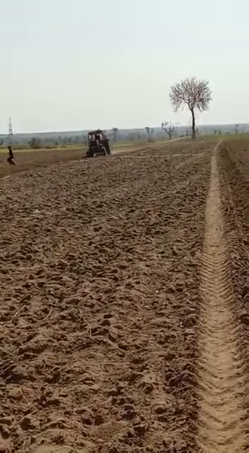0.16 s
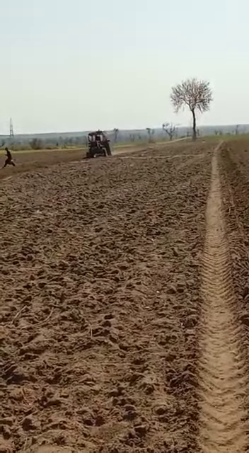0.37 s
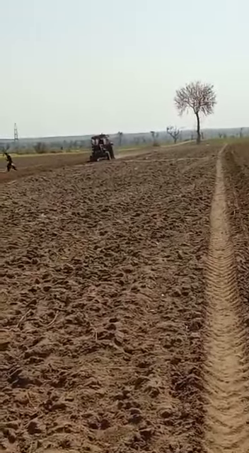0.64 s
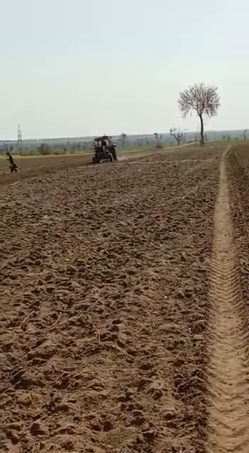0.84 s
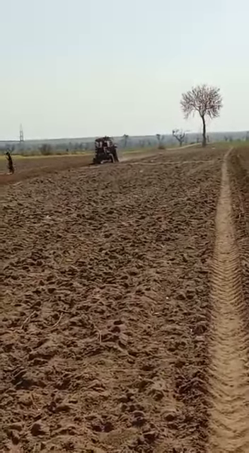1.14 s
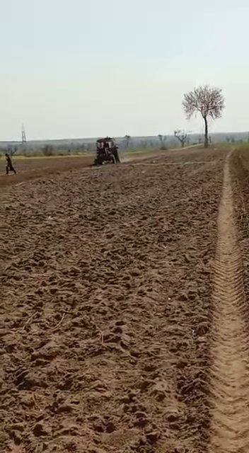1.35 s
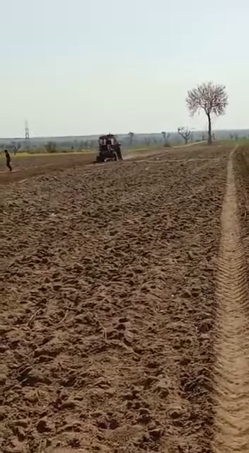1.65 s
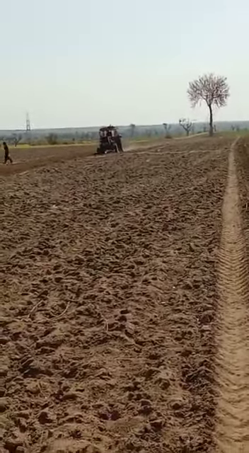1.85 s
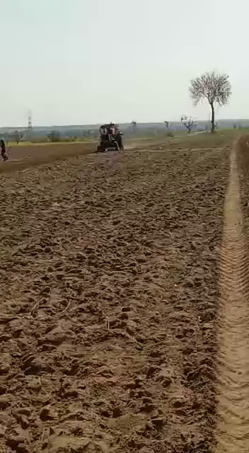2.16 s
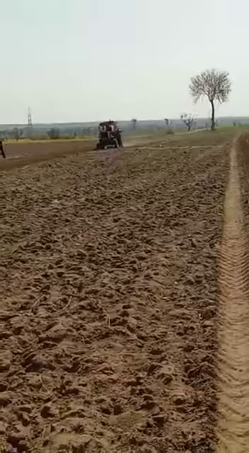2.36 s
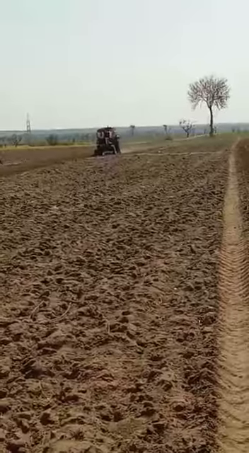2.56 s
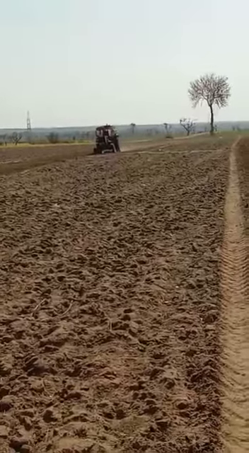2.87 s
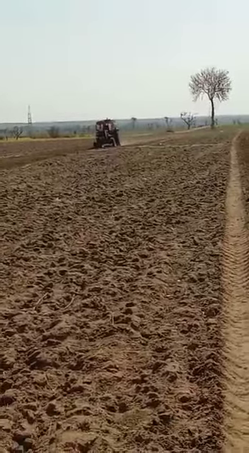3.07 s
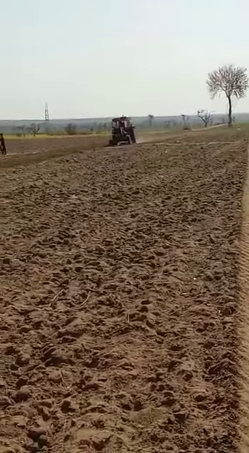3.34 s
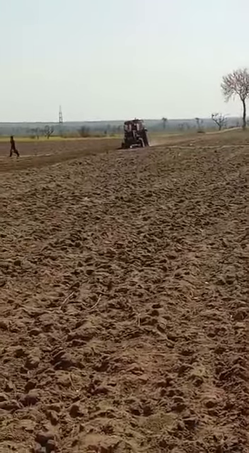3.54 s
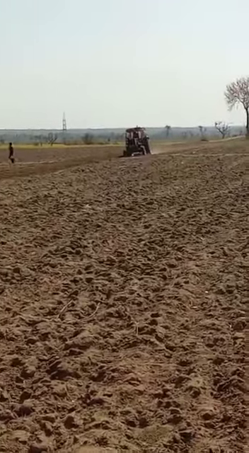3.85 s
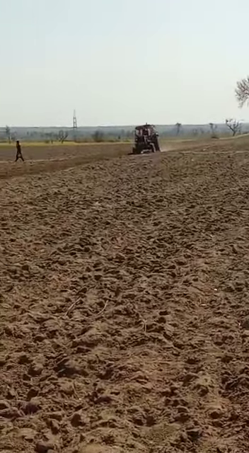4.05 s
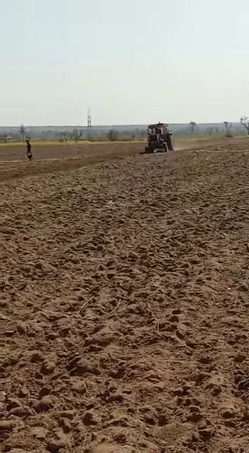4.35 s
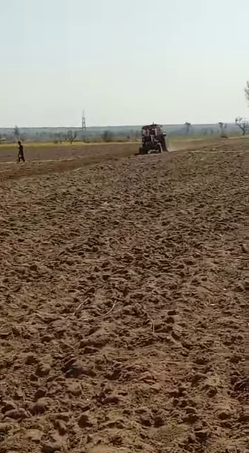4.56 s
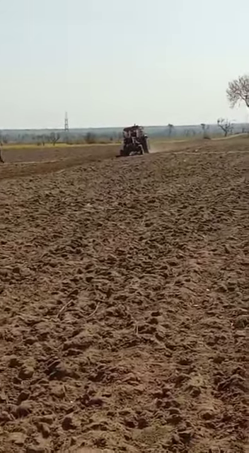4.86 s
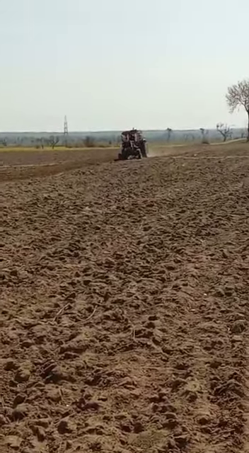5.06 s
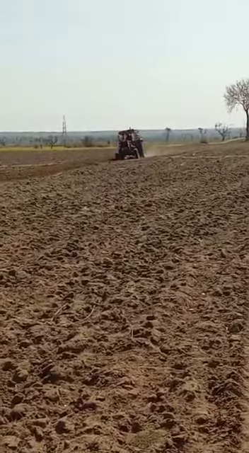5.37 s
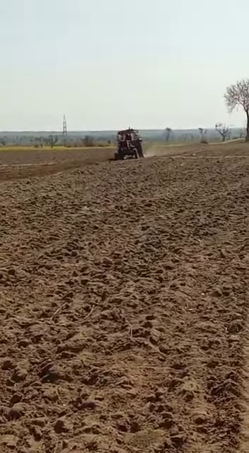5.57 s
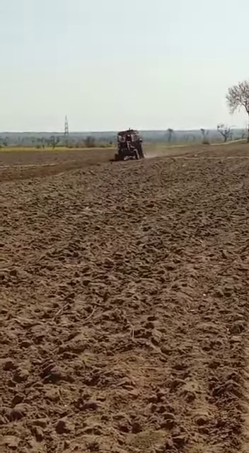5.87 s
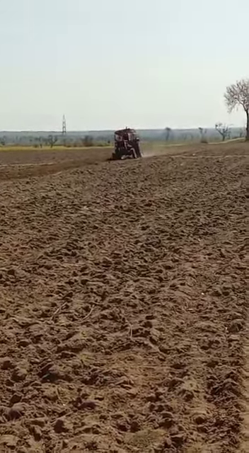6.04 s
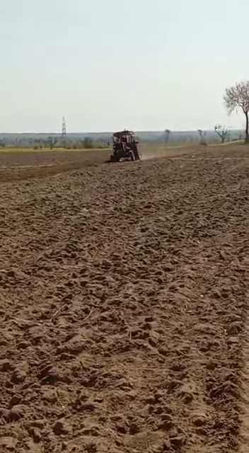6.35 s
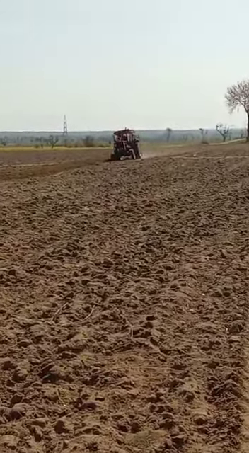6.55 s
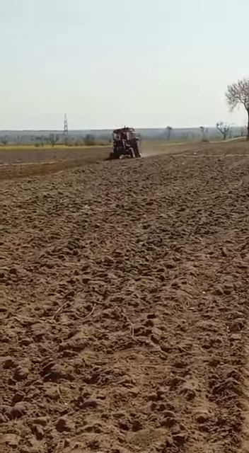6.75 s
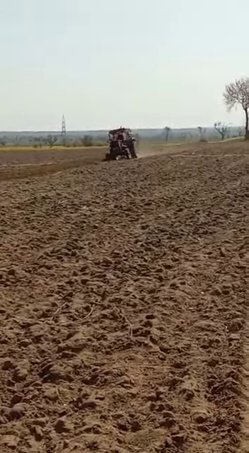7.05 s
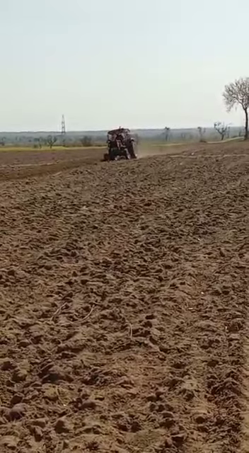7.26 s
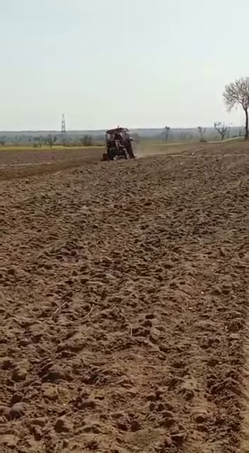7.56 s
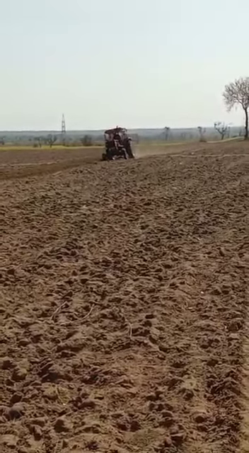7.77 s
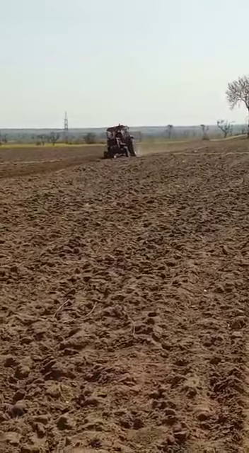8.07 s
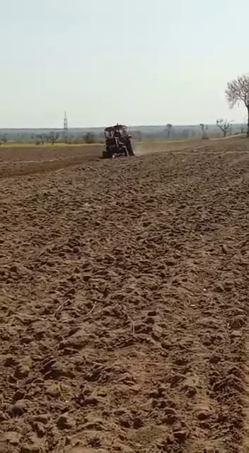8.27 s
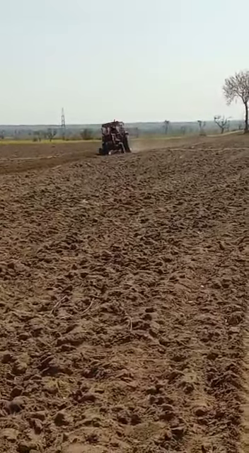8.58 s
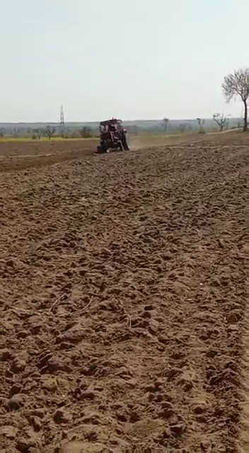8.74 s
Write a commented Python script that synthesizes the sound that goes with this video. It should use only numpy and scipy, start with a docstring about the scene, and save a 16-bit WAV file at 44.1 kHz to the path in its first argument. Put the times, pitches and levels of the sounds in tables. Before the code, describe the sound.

A hand-held microphone far from a working tractor catches steady diesel clatter, around forty knocks a second, some harder than others. At first it is thin and wavering, with small low thumps near the start. The engine speed barely shifts, sagging slightly after the middle. As the machine nears, the knock, hum and roar fill out, with bright fizzing treble in the last two seconds over faint low wind.

```python
"""Hard diesel clatter over a low exhaust beat: a three-cylinder tractor works across a field, slowly nearing.
Each firing knocks the block: a smeared blow and noise bursts ring through resonances in five registers.
The exhaust is a set of wavering cosines locked to the firings; a hum and a throbbing noise roar join it.
Moving air makes the clatter swell and fade; low wind noise, short thumps, a tick and hiss lie behind."""
import sys
import numpy as np
from scipy import signal
from scipy.fft import rfft, irfft, next_fast_len
from scipy.io import wavfile
from scipy.ndimage import uniform_filter1d, map_coordinates

SR = 44100
rng = np.random.default_rng(int(sys.argv[2]) if len(sys.argv) > 2 else 0)


def persist_wave(psi):
    """Save psi, clipped to +-1, as 16-bit WAV."""
    counts = np.round(np.clip(psi, -1, 1) * 32767).astype(np.int16)
    wavfile.write(sys.argv[1], SR, np.atleast_2d(counts).T)


N = 392931
TIME_S = np.arange(N) / SR

# Level tables hold values before the trims, gains and wavering added in the code.
# Engine speed, sagging a little under load. Each row: time in seconds, firings per second.
FIRING_RATE = [(0.0, 40.625), (2.42, 40.636), (2.67, 41.102), (3.01, 40.933), (4.08, 41.493),
               (4.89, 41.164), (5.35, 40.405), (6.02, 39.752), (6.24, 40.118), (7.42, 40.139),
               (7.84, 39.453), (8.91, 39.726)]
FIRST_FIRING_COUNT = .159  # firing periods before the first firing
# Voice of each cylinder, in firing order. Each row: low knock, high knock, treble, all in dB.
CYLINDER_VOICES = [(6, 2, 6.5), (1.7, 3, 2.5), (-0.9, 3, -0.3)]
# Firings that replace the cylinder's voice. Each row: time in seconds, low knock, high knock, treble in dB.
HARD_KNOCKS = [(0.176, -9, 9, 9), (0.299, 3, -4, 9), (0.324, -1, 5.5, 8), (0.398, 8, 6.5, 5.5),
               (0.545, 8, 10.5, 10), (0.57, -8, 14, 3), (0.595, 9.5, 10, 11.5), (1.308, 9, 9.5, -4),
               (1.579, 6, 14, 4), (1.628, 11.5, -1, 12.5), (1.727, -10, 12.5, 9), (1.899, 2, 4.5, 12.5),
               (2.17, 5, 3, 5), (2.317, 9, 5.5, 3), (2.514, 6, 10, 14), (2.587, 11.5, 13.5, 16),
               (2.709, 1, 9, 6), (2.758, 6, 9, -7), (2.807, 9.5, 6.5, -3), (2.831, 10, -3, -2),
               (2.977, 9.5, 7.5, 3), (3.026, 11, 10.5, 24), (3.246, 9, -3, 7), (3.707, 6, 11.5, 4),
               (3.828, -11, 13, 10.5), (3.877, -2, 10, -6), (3.997, 9.5, 6, 3), (4.142, -2, 9.5, 1),
               (4.166, -4, 8, 6.5), (4.504, 10.5, -2, 8.5), (4.965, 13, 1, 6), (5.408, 6.5, -6, 15.5),
               (5.433, 9.5, 1, 14), (5.557, -1, 4, 8.5), (5.681, 7.5, 7.5, 2), (5.806, 14.5, 5.5, 6.5),
               (5.831, 8, 9, 1), (5.956, -8, 9.5, 8), (6.007, -2, 9, 9.5), (6.032, 6, -2, 12.5),
               (6.107, 10.5, -3, 5), (6.157, 7, 7.5, 7.5), (6.207, 4, 13.5, 4.5), (6.382, 9.5, 8.5, 6.5),
               (6.531, 10.5, 4, 4), (6.631, -7, 7.5, 6), (6.656, 8, 9.5, 10.5), (6.756, -9, 9.5, -8),
               (6.855, 8, 7, 7.5), (6.88, 0, 13, 0), (7.03, 7.5, 8.5, 10), (7.08, 12.5, 3.5, 10),
               (7.155, 10, 6, 11.5), (7.204, 0, 8, 12.5), (7.304, 7, 10, 11), (7.329, -2, 8.5, 6),
               (7.379, 10, 6, 16), (7.453, 8, 10.5, 8), (7.579, 0, 6, 10), (7.654, 9, 6, 6),
               (7.78, 7, 8.5, 10), (8.21, 8.5, 9, 10), (8.286, 15.5, 11, 16), (8.311, 0, 10, 12),
               (8.337, 7, 7, 11), (8.438, -2, 10, 14), (8.463, 5.5, 6, 1), (8.614, 7.5, 12.5, 14),
               (8.665, 10, 3, 15), (8.816, 14, -4, 8), (8.866, 5, 6.5, 2)]
# Clatter resonances from far off. Each row: centre in Hz, width in Hz, relative level in dB.
FAR_MODES = [(763, 280, -39), (908, 270, -25), (1270, 115, -13.5), (1398, 160, -9), (1610, 140, -10),
             (1817, 210, -11), (2115, 70, -12.5), (2540, 270, -8), (2740, 140, -4), (3214, 360, -4.5),
             (3450, 230, -4.5), (4400, 540, -13), (4800, 360, -15), (5273, 215, 4), (6010, 190, -5.5),
             (6350, 350, -14.5), (6900, 250, -9.5), (7690, 230, -15.5), (8180, 260, -26), (8700, 160, -30),
             (10800, 1700, -52), (13100, 6000, -56.5)]
# Clatter resonances from nearer. Each row: centre in Hz, width in Hz, relative level in dB.
NEAR_MODES = [(770, 316, -58), (899, 165, -50), (1228, 59, -10.5), (1336, 93, -1.5), (1568, 200, 1.5),
              (1752, 122, 2), (2120, 190, -10), (2510, 178, -4.5), (2704, 170, -4.5), (3244, 236, 3.5),
              (3380, 165, 1), (3973, 180, -10.5), (4250, 240, -10), (5034, 262, -0.5), (5630, 120, -3.5),
              (5830, 170, -8), (6590, 520, -8), (7400, 230, -19), (7720, 330, -19), (8050, 410, -30.5),
              (8480, 250, -28.5), (10960, 3000, -53), (14700, 3900, -50.5)]
# Narrow dips in the clatter at any distance. Each row: centre in Hz, width in Hz, gain in dB.
DIPS = [(3716, 120, -6), (6070, 120, -9), (7200, 120, -1)]
# Edges between the clatter registers, in Hz.
REGISTER_EDGES_HZ = [1050, 2250, 3750, 6150, 9000, 17000]
# Trim of low knock, high knock, treble, upper treble and fizz, in dB.
REGISTER_TRIM_DB = [1, 1, 1, 1, -0.86]
# Low knock as the air carries it. Each row: time in seconds, level in dB.
LOW_KNOCK_LEVEL = [(0.0, -63), (0.37, -55.5), (0.52, -62.5), (0.57, -55), (1.09, -64.5), (2.17, -47.5),
                   (2.27, -57.5), (2.32, -50.5), (2.47, -48), (2.51, -44), (3.03, -48.5), (3.1, -57),
                   (3.32, -49), (4.19, -54), (5.04, -54), (5.09, -48.5), (5.26, -56), (5.46, -55.5),
                   (5.68, -47.5), (5.73, -55), (5.78, -51), (6.93, -45.5), (7.0, -41.5), (7.45, -39.5),
                   (7.5, -48), (7.68, -47.5), (7.73, -41.5), (7.88, -53.5), (8.08, -44), (8.16, -47),
                   (8.21, -40.5), (8.32, -42), (8.36, -44.5), (8.42, -39), (8.89, -42)]
# High knock. Each row: time in seconds, level in dB.
HIGH_KNOCK_LEVEL = [(0.0, -62), (0.08, -56), (0.4, -51), (0.5, -61.5), (0.74, -48), (0.79, -55),
                    (0.87, -54.0), (1.06, -67.5), (1.19, -59), (1.36, -61.5), (1.92, -44.5), (2.17, -48),
                    (2.22, -53.5), (2.76, -44), (3.2, -55), (3.27, -51.5), (4.21, -52), (4.43, -57.5),
                    (4.6, -46), (4.67, -54.5), (4.82, -45.5), (5.14, -50), (5.19, -45), (5.36, -51),
                    (6.03, -44), (6.13, -49), (6.18, -45.5), (6.23, -48), (6.66, -42.5), (6.93, -46),
                    (7.13, -37), (7.33, -40), (7.4, -45), (8.32, -42.5), (8.36, -46), (8.42, -43),
                    (8.61, -41.5), (8.82, -44.5), (8.89, -41.5)]
# Clatter treble. Each row: time in seconds, level in dB.
TREBLE_LEVEL = [(0.0, -56.5), (0.35, -49.5), (0.42, -50.5), (0.47, -68), (0.59, -51), (0.84, -51),
                (1.06, -67.5), (1.28, -64), (1.33, -55.5), (1.46, -68), (1.55, -54), (1.95, -51),
                (2.27, -67), (2.34, -58), (2.61, -60), (2.66, -54.5), (2.93, -55), (3.0, -70),
                (3.08, -61.5), (3.25, -67.5), (3.59, -55.5), (3.66, -60.5), (3.76, -50.5), (3.85, -58),
                (4.24, -54.5), (4.29, -62.5), (4.46, -61), (4.5, -55), (5.09, -47.5), (5.23, -67),
                (5.31, -59), (5.48, -48.0), (5.73, -54.5), (5.83, -46.5), (6.48, -44), (6.88, -52.5),
                (7.35, -49), (7.6, -48), (7.73, -58.5), (8.34, -50), (8.77, -55), (8.89, -48.5)]
# Upper treble of the clatter. Each row: time in seconds, level in dB.
UPPER_TREBLE_LEVEL = [(0.0, -68), (0.08, -58.5), (0.13, -62), (0.84, -62), (0.94, -81), (1.23, -73),
                      (1.36, -96), (1.43, -67), (1.9, -64), (2.44, -68.5), (2.49, -60.5), (2.78, -60),
                      (3.08, -65.5), (3.2, -73), (3.37, -70), (3.49, -78), (3.61, -60.5), (3.95, -72),
                      (4.05, -68), (4.17, -73), (4.58, -67), (4.65, -91), (4.72, -61.5), (5.06, -64),
                      (5.19, -81), (5.41, -60), (5.73, -74), (5.96, -60.5), (6.01, -64), (6.13, -52),
                      (6.21, -73), (6.28, -63), (6.71, -59.5), (6.86, -62), (7.25, -48.5), (7.33, -53),
                      (8.19, -56), (8.89, -54.5)]
# Fizz above the upper treble. Each row: time in seconds, level in dB.
FIZZ_LEVEL = [(0.0, -90), (0.67, -100), (1.65, -81.5), (1.95, -70), (2.19, -72.5), (2.37, -68.5),
              (2.42, -74), (2.64, -65), (2.88, -64), (3.2, -81.5), (3.63, -78), (4.14, -80), (4.24, -78.5),
              (5.33, -82), (6.11, -82.5), (6.18, -85), (6.88, -70.5), (6.93, -63.5), (7.0, -60.5),
              (7.13, -68), (7.35, -58.5), (7.47, -56), (7.58, -70), (7.7, -71), (7.83, -59), (7.91, -61),
              (8.03, -67), (8.11, -59), (8.21, -68), (8.36, -67.5), (8.54, -70), (8.64, -60.5),
              (8.89, -68.5)]
# Exhaust lines. Each row: frequency in thirds of the firing rate, relative level in dB.
EXHAUST_LINES = [(5, -18), (6, 0.5), (9, 1), (11, -29), (12, -25), (15, -27.5), (18, -24.5), (21, -32),
                 (23, -30), (24, -30.5), (26, -34.5)]
# Strongest exhaust line. Each row: time in seconds, level in dB.
BEAT_LEVEL = [(0.0, -63.5), (0.18, -60), (0.64, -74), (0.69, -60.5), (1.14, -67), (2.54, -67),
              (3.97, -62.5), (5.11, -52), (5.21, -62.5), (5.66, -57), (5.81, -63.5), (6.61, -59),
              (6.66, -55), (7.05, -49.5), (7.15, -55.5), (7.25, -48.5), (7.68, -51.5), (7.78, -60),
              (7.93, -53), (8.16, -58.5), (8.46, -51.5), (8.89, -53)]
# Exhaust line above it. Each row: time in seconds, level in dB.
OVERTONE_LEVEL = [(0.0, -62), (0.05, -65.5), (1.48, -68.5), (2.73, -64.5), (4.21, -65.5), (5.11, -59),
                  (5.21, -63), (6.36, -62.5), (7.35, -56), (8.13, -61.5), (8.64, -56), (8.89, -56)]
# Roar spectrum. Each row: frequency in Hz, relative gain in dB.
ROAR_SPECTRUM = [(100, -1), (150, 5), (220, 3.5), (310, -1), (390, -3), (480, -9), (580, -7.5), (720, 2.5),
                 (900, 6), (1060, 0.5), (1300, 4), (2000, -54)]
# Growl under the knock. Each row: time in seconds, level in dB.
GROWL_LEVEL = [(0.0, -77), (1.36, -75.5), (1.43, -68), (1.46, -77), (2.4, -71.5), (2.53, -66), (2.63, -71),
               (3.07, -68.5), (3.1, -73.5), (3.54, -71.5), (3.57, -67), (3.77, -71.5), (4.73, -72),
               (7.46, -66.5), (7.68, -68.5), (8.9, -64.5)]
# Wind spectrum. Each row: frequency in Hz, relative gain in dB.
WIND_SPECTRUM = [(10, -11), (25, -17), (45, -12.5), (65, -5), (90, -1), (115, -16), (150, -12),
                 (220, -22.5), (500, -69)]
# Wind rumble. Each row: time in seconds, level in dB.
WIND_LEVEL = [(0.7, -77), (1.63, -85), (3.87, -80), (5.11, -72), (5.29, -80), (6.23, -81), (7.53, -64),
              (7.85, -83), (7.92, -74), (8.08, -81), (8.83, -75), (8.9, -69)]
# Bumps of wind on the microphone. Each row: start in seconds, peak of the envelope in dB.
THUMPS = [(.2, -51), (0.303, -42), (0.323, -47), (0.35, -47), (0.368, -46), (0.475, -50), (0.542, -48.5)]
# Thin tick close by. Each row: start in seconds, level in dB.
TICKS = [(.143, -51.5)]
# Spectrum of the air over the field. Each row: frequency in Hz, relative gain in dB.
FIELD_SPECTRUM = [(500, -10), (1500, -6), (4400, 5), (6200, -0.5), (8000, -6), (10000, -33)]
# The tractor drives straight towards the microphone.
START_M, SPEED_M_PER_S = 72, 2.2
ROAR_START_DB, ROAR_DB_PER_HALVING = -67, 12  # low roar, before wavering
BAND_EDGE_HZ = 15550


def clatter(firings, jitter_s=.00005, lead_s=0.001185, rush_from_db=-66,
            detour_mean_s=0.000694, detour_sweep=0.19, ground_db=-9):
    """Diesel knock rings the block; the air carries each register differently."""
    at = np.nonzero(np.diff(np.floor(firings)))[0]
    low, high, treble, top = blow_sizes(at)
    offset_s = jitter_s * rng.standard_normal(len(at)) - lead_s
    at = np.clip(at + (SR * offset_s).astype(int), 0, N - 1)
    level_tables = (LOW_KNOCK_LEVEL, HIGH_KNOCK_LEVEL, TREBLE_LEVEL, UPPER_TREBLE_LEVEL, FIZZ_LEVEL)
    levels_db = [curve(rows) for rows in level_tables]
    # as the fizz swells, a rush fills the gaps between the knocks
    rush_db = .5 * (levels_db[-1] - rush_from_db)
    registers = [
        knocks(at, low, half_s=.0024, fresh=.45, tail_db=-6, tail_s=.010,
               bed_db=.4 * rush_db - 10, after_db=-8),
        knocks(at, high, half_s=.0019, fresh=.5, tail_db=-13, tail_s=.012,
               bed_db=.7 * rush_db - 9, after_db=-14),
        knocks(at, treble, half_s=.0020, fresh=.65, tail_db=-10.5, tail_s=.009,
               bed_db=rush_db - 4, after_db=-14),
        knocks(at, top, half_s=.0023, fresh=.85, tail_db=-7, tail_s=.009,
               bed_db=rush_db - 1, after_db=-13),
        knocks(at, top, half_s=.0020, fresh=.9, tail_db=-5, tail_s=.007,
               bed_db=-9.5, after_db=-14)]
    near = np.clip((TIME_S - 2.7) / 0.72, 0, 1)  # crossfade of the two sets of resonances
    # the reflection off the uneven ground wanders and sweeps the colour
    detour_s = detour_mean_s * (1 + detour_sweep * drift(4))
    out = np.zeros(N)
    bands = zip(registers, REGISTER_EDGES_HZ, REGISTER_EDGES_HZ[1:], levels_db, REGISTER_TRIM_DB)
    for (drive, envelope), lo_hz, hi_hz, level_db, trim_db in bands:
        far_block = evened(ringing(drive, FAR_MODES, lo_hz, hi_hz))
        near_block = evened(ringing(drive, NEAR_MODES, lo_hz, hi_hz))
        block = (1 - near) * far_block + near * near_block
        if hi_hz == REGISTER_EDGES_HZ[-1]:
            block = echoed(block, delay_s=.00118, db=-7)
            block = fluttering(block, depth_db=3.5, patch_hz=1100, patch_s=.05)
        else:
            block = echoed(block, delay_s=detour_s, db=ground_db)
            block = wobbling(block, shift_hz=24, per_s=30)
            patch_hz = 140 * np.sqrt(lo_hz / REGISTER_EDGES_HZ[0])
            block = fluttering(block, depth_db=4.8, patch_hz=patch_hz, patch_s=.036)
        delayed_envelope = np.roll(envelope, SR // 1000)
        out += amp(level_db + trim_db) * as_loud_as(block, delayed_envelope, .013)
    return out


def blow_sizes(at, shared_db=.5, own_db=2.5, top_share=0.43):
    """Uneven combustion: each cylinder has its voice, some firings knock hard; top gets a share of treble dB."""
    chance = np.clip(rng.standard_normal((len(at), 5)), -2, 1.6)
    voice_db = np.array(CYLINDER_VOICES, float)[np.arange(len(at)) % len(CYLINDER_VOICES)]
    band_db = np.c_[voice_db, voice_db[:, -1]]
    band_db = band_db + shared_db * chance[:, :1] + own_db * chance[:, 1:]
    for s, low_db, high_db, treble_db in HARD_KNOCKS:
        nearest = np.argmin(abs(at / SR - s))
        band_db[nearest] = low_db, high_db, treble_db, top_share * treble_db
    return amp(band_db.T)


def knocks(at, size, half_s, fresh, tail_db, tail_s, bed_db, after_db,
           after_s=0.014, grain_db=0.2, knock_s=0.0018):
    """Firings as blows smeared by paths through the block, rattle, tail, after-rattle; returns sound, envelope."""
    blows = np.zeros(N)
    blows[at] = size
    t = np.arange(-2048, 2049) / SR
    burst = np.exp(-(t / half_s) ** 4)
    burst *= knock_s * SR / burst.sum()  # rms 1 over the length of a knock
    tail = amp(tail_db) ** 2 * np.exp(-abs(t) / tail_s) * (t > 0)
    tail += amp(after_db) ** 2 * np.exp(-((t - after_s) / half_s) ** 2)
    fresh = np.clip(fresh, 0, 1)  # share of burst power that is noise
    # the tail grows less with the blow than the burst does
    rattle_power = signal.oaconvolve(blows ** 2, fresh * burst, "same")
    rattle_power = rattle_power + signal.oaconvolve(blows, tail, "same")
    smeared_power = signal.oaconvolve(blows ** 2, (1 - fresh) * burst, "same")
    grid_hz = np.linspace(0, SR / 2, 90)
    delay_s = half_s * (-1) ** np.arange(len(grid_hz)) * rng.uniform(.6, 1, len(grid_hz))

    def smear(hz):
        # phase is the integral of delay over frequency
        return np.exp(-2j * np.pi * np.cumsum(np.interp(hz, grid_hz, delay_s)) * hz[1])

    smeared = shaped(blows, smear) * np.sqrt((1 - fresh) * burst.sum())
    grains = evened(amp(grain_db * np.clip(drift(210), -2, 2)))  # loose parts rattle in clumps of a few ms
    bed_power = amp(bed_db) ** 2
    rattle = np.sqrt(abs(rattle_power) + bed_power) * grains * rng.standard_normal(N)
    envelope = np.sqrt(abs(rattle_power + smeared_power) + bed_power) * grains
    return np.array([smeared + rattle, envelope]) / np.sqrt(1 + bed_power)


def ringing(x, modes, lo_hz, hi_hz):
    """Minimum-phase resonances within one band; they ring on after each blow."""
    grid_hz = np.fft.fftfreq(4096, 1 / SR)
    power = sum(amp(db) ** 2 / (1 + (2 * (abs(grid_hz) - f) / width) ** 2) ** 2 for f, width, db in modes)
    dips_db = sum(db * np.exp(-((abs(grid_hz) - f) / width) ** 2) for f, width, db in DIPS)
    log_gain = .5 * np.log(power) + np.log(amp(dips_db))
    gain = np.exp(np.conj(signal.hilbert(log_gain)))[grid_hz > 0]
    grid_hz = grid_hz[grid_hz > 0]
    band_power = 1 / (1 + (lo_hz / grid_hz) ** 40) / (1 + (grid_hz / hi_hz) ** 40)
    return shaped(x, lambda hz: np.interp(hz, grid_hz, gain * np.sqrt(band_power)))


def exhaust(firings, beat_db, overtone_db, waver=0.055, upper_follow=0.19, upper_db=-53):
    """Clean low lines of the firing beat; the weak upper ones swell less."""
    out = np.zeros(N)
    for thirds, line_db in EXHAUST_LINES:
        order = round(thirds) / len(CYLINDER_VOICES)
        if order <= 2:
            level_db = beat_db
        elif order <= 3:
            level_db = overtone_db
        else:
            level_db = upper_db + upper_follow * (beat_db - upper_db)
        unrest = waver * (order / 2) ** 0.89  # higher lines waver more
        angle = 2 * np.pi * (order * firings + rng.random()) + unrest * drift(13)
        out += np.sqrt(2) * amp(level_db + line_db) * np.cos(angle) * (1 + unrest * drift(13))
    return out


def roar(firings, low_db, throb=0.12, growl_db=3.0, growl_waver_db=1.23, repeat=1.12):
    """Dull rush of gas and machinery throbbing with the firings; its upper half, a growl, swells by itself."""
    # part of the rush repeats every engine cycle, which draws faint lines
    cycle = rng.standard_normal(3200)
    cycle_index = (firings / len(CYLINDER_VOICES) * len(cycle)).astype(int) % len(cycle)
    noise = rng.standard_normal(N) + repeat * cycle[cycle_index]
    rush = coloured(noise * (1 + throb * np.cos(2 * np.pi * firings)), ROAR_SPECTRUM)
    lower = shaped(rush, lambda hz: 1 / (1 + (hz / 550) ** 8))
    growl = evened(fluttering(rush - lower, depth_db=3.3, patch_hz=90, patch_s=.09))
    growl = growl * amp(curve(GROWL_LEVEL) + growl_db + growl_waver_db * drift(8.8))
    return amp(low_db) * fluttering(lower, depth_db=2.8, patch_hz=125, patch_s=.06) + growl


def halvings():
    """How many times the distance to the tractor has halved since the start."""
    return np.log2(START_M / np.maximum(START_M - SPEED_M_PER_S * TIME_S, 1))


def driveline(firings, beat_db, ratio=2.37, rel_db=-10.0, third_db=-81, waver_rad=0.77):
    """A wavering hum with a faint third harmonic, as from a shaft geared to the engine."""
    angle = 2 * np.pi * ratio * firings + waver_rad * drift(5.7)
    hum = amp(beat_db + rel_db) * np.cos(angle) + amp(third_db) * np.cos(3 * angle)
    return np.sqrt(2) * hum * (1 + drift(3.1) / 4)


def wind(level_db, gain_db=5):
    """Lumpy low rumble at the microphone: coloured noise under a random swell."""
    lumps = amp(3.2 * drift(16))
    return amp(level_db + gain_db) * evened(coloured(rng.standard_normal(N), WIND_SPECTRUM) * lumps)


def bumps(thump_hz=88, rise_s=0.0055, drop=0.48, tick_hz=12500, tick_s=0.0022):
    """Short low thumps on the microphone, falling in pitch to thump_hz, and a thin tick of decaying noise."""
    out, t = np.zeros(N), np.arange(SR // 10) / SR
    cycles = np.cumsum(thump_hz * (1 + drop * np.exp(-t / rise_s))) / SR
    envelope = t / rise_s * np.exp(1 - t / rise_s)
    for s, db in THUMPS:
        add(out, s, amp(db) * envelope * np.sin(2 * np.pi * cycles))
    band_hz = [0.9 * tick_hz, min(1.14 * tick_hz, SR / 2 - 1)]
    bright = signal.butter(2, band_hz, "band", fs=SR, output="sos")
    for s, db in TICKS:
        noise = evened(signal.sosfilt(bright, rng.standard_normal(len(t))))
        add(out, s, amp(db) * np.exp(-t / tick_s) * noise)
    return out


def hiss(mic_db=-90, field_db=-76):
    """A soft wash of air over the field and the faint even hiss of the microphone."""
    wash = coloured(rng.standard_normal(N), FIELD_SPECTRUM)
    return amp(field_db) * wash + amp(mic_db) * rng.standard_normal(N)


def fluttering(x, depth_db, patch_hz, patch_s):
    """Eddies along the way lift and dim narrow patches of the spectrum."""
    hz, t, z = signal.stft(x, SR, nperseg=512, noverlap=384)
    where = np.meshgrid(hz / patch_hz, t / patch_s, indexing="ij")
    patches = evened(map_coordinates(rng.standard_normal((160, 400)), where, order=2, mode="wrap"))
    z = z * amp(depth_db * np.clip(patches, -2, 2))
    return signal.istft(z, SR, nperseg=512, noverlap=384)[1][:N]


def echoed(x, delay_s, db):
    """One close reflection combs the spectrum."""
    return x + amp(db) * np.interp(TIME_S - delay_s, TIME_S, x)


def wobbling(x, shift_hz, per_s):
    """Moves all resonances a little up or down from stroke to stroke, by shifting the whole band."""
    angle = 2 * np.pi * np.cumsum(shift_hz * np.clip(drift(per_s), -2, 2)) / SR
    return (signal.hilbert(x, next_fast_len(N))[:N] * np.exp(1j * angle)).real


def as_loud_as(x, model, window_s):
    """Gives x the running rms of model and keeps its faster detail."""
    size = int(window_s * SR)

    def running_power(v):
        return abs(uniform_filter1d(uniform_filter1d(v * v, size), size)) + 1e-20

    return x * np.sqrt(running_power(model) / running_power(x))


def amp(db):
    """Amplitude of a level in dB."""
    return 10 ** (np.asarray(db) / 20)


def evened(x):
    """Scales x to rms 1."""
    return x / np.sqrt(np.mean(x ** 2) + 1e-20)


def curve(rows):
    """Straight lines through (seconds, value) rows, per sample."""
    s, values = np.transpose(rows)
    return np.interp(TIME_S, s, values)


def drift(per_s):
    """Smooth random curve of rms 1 through per_s knots a second."""
    knots = rng.standard_normal(2000)
    coarse = map_coordinates(knots, [TIME_S[::64] * per_s], order=3, mode="wrap")
    return evened(coarse).repeat(64)[:N]


def shaped(x, gain_at):
    """Filters x by a gain given as a function of frequency."""
    size = next_fast_len(N + 4096)
    hz = np.fft.rfftfreq(size, 1 / SR)
    return irfft(rfft(x, size) * gain_at(hz), size)[:N]


def coloured(x, points):
    """Filters x to a spectrum given as (Hz, dB) points and scales it to rms 1."""
    f, db = np.transpose(points)
    return evened(shaped(x, lambda hz: amp(np.interp(np.log(hz + 1), np.log(f), db))))


def add(mix, s, sound):
    """Adds sound to mix from s seconds on, cut at the end."""
    part = mix[round(s * SR):][:len(sound)]
    part += sound[:len(part)]


def scene(beat_gain_db=0.06, overtone_gain_db=0.1, beat_waver_db=1.07, roar_waver_db=0.9):
    """The count of firings drives all engine sounds; the roar grows as the tractor comes nearer."""
    firings = np.cumsum(curve(FIRING_RATE)) / SR - FIRST_FIRING_COUNT
    beat_db = curve(BEAT_LEVEL) + beat_gain_db + beat_waver_db * drift(8.7)
    overtone_db = curve(OVERTONE_LEVEL) + overtone_gain_db + beat_waver_db * drift(24)
    roar_db = ROAR_START_DB + ROAR_DB_PER_HALVING * halvings() + roar_waver_db * drift(17)
    engine = clatter(firings) + roar(firings, roar_db)
    drone = exhaust(firings, beat_db, overtone_db) + driveline(firings, beat_db)
    background = wind(curve(WIND_LEVEL)) + bumps() + hiss()
    return (engine + drone + background)[None]


def record(dry):
    """Linear-phase low-pass at the upper band edge."""
    lowpass = signal.firwin(511, BAND_EDGE_HZ, window=("kaiser", 9), fs=SR)
    return signal.oaconvolve(dry, lowpass[None], "same")


dry = scene()
out = record(dry)
persist_wave(out)
```